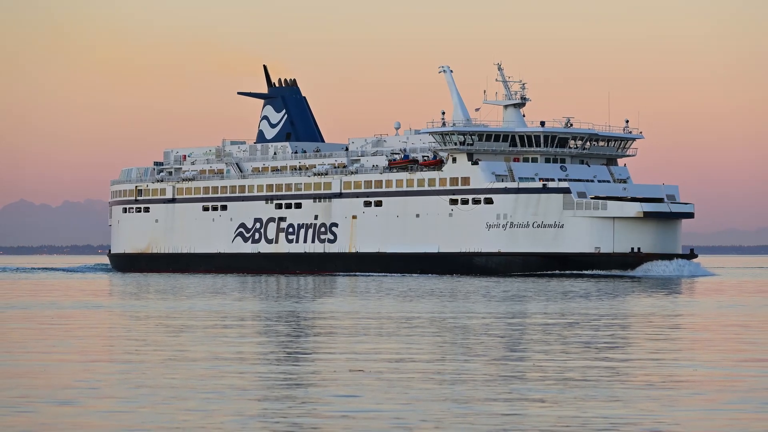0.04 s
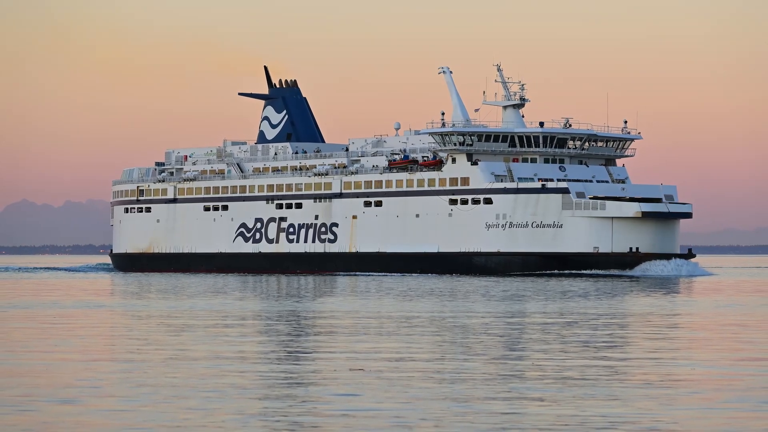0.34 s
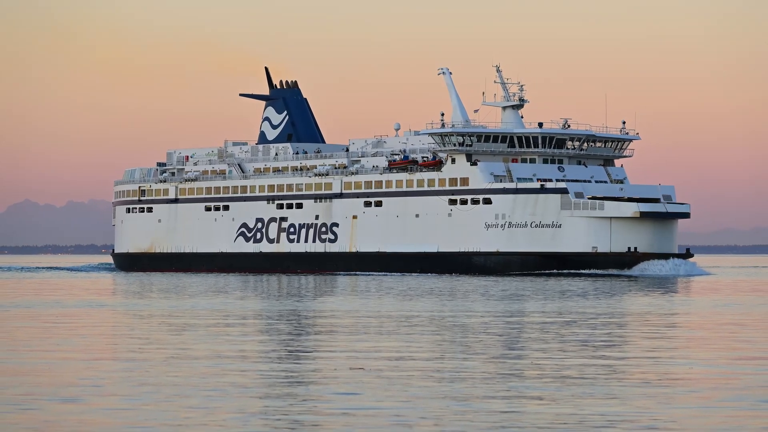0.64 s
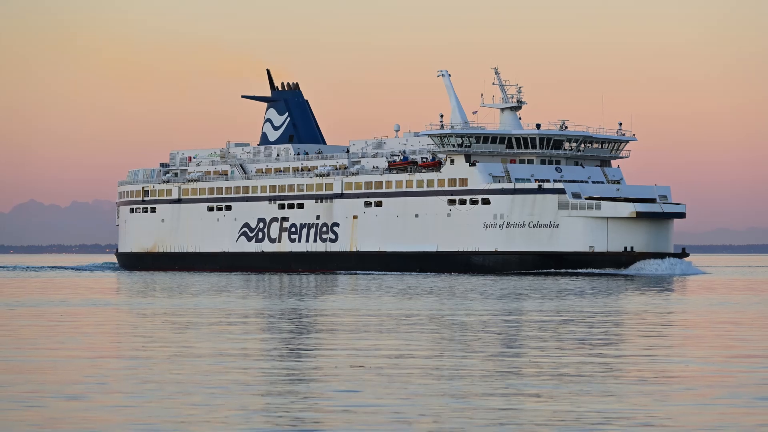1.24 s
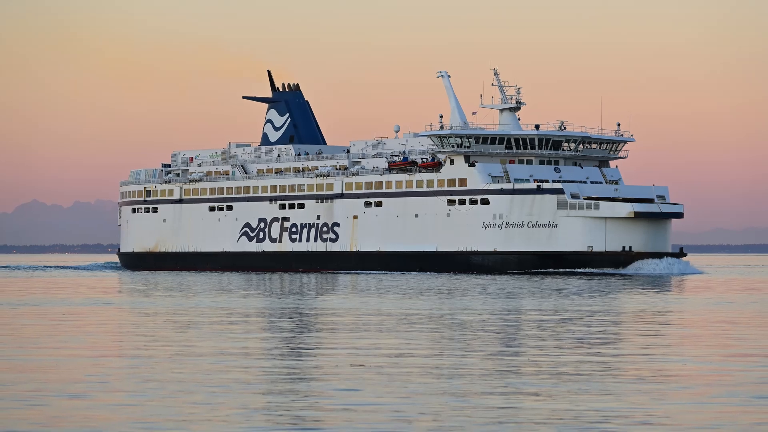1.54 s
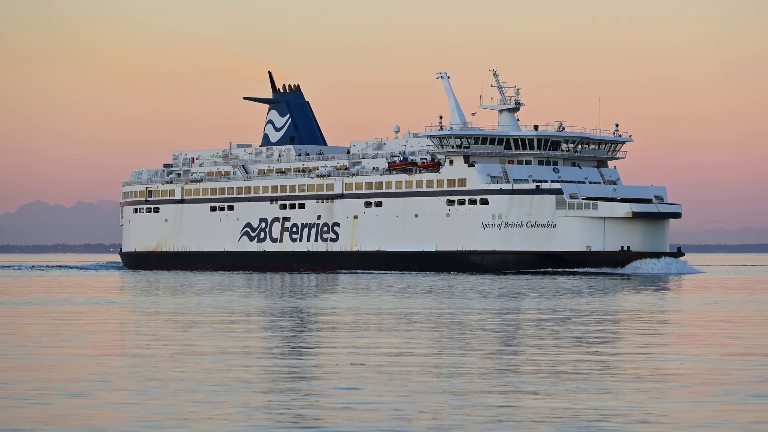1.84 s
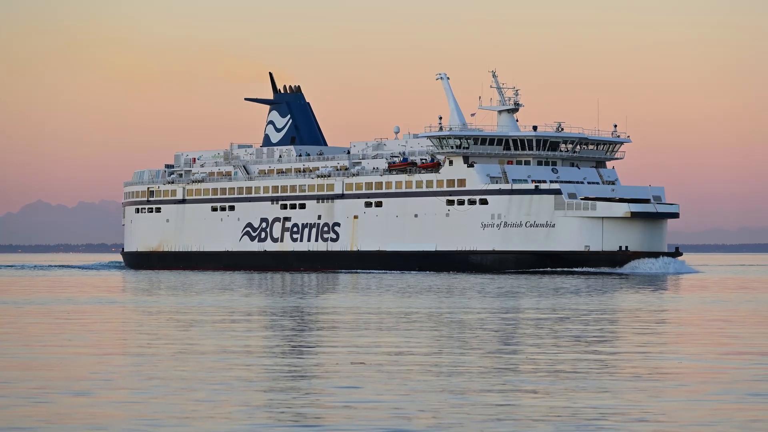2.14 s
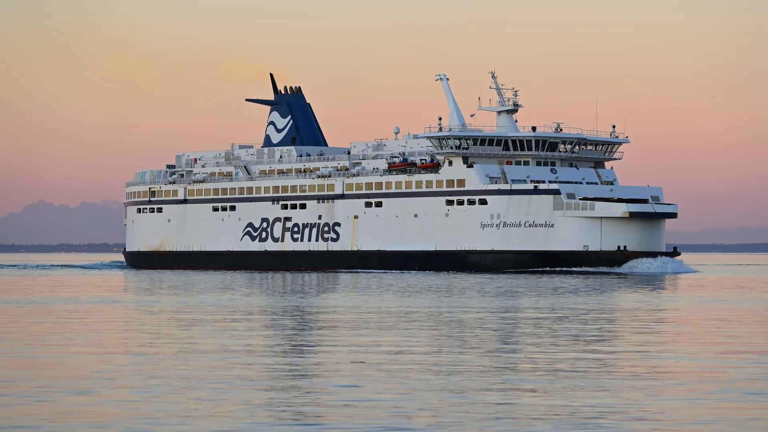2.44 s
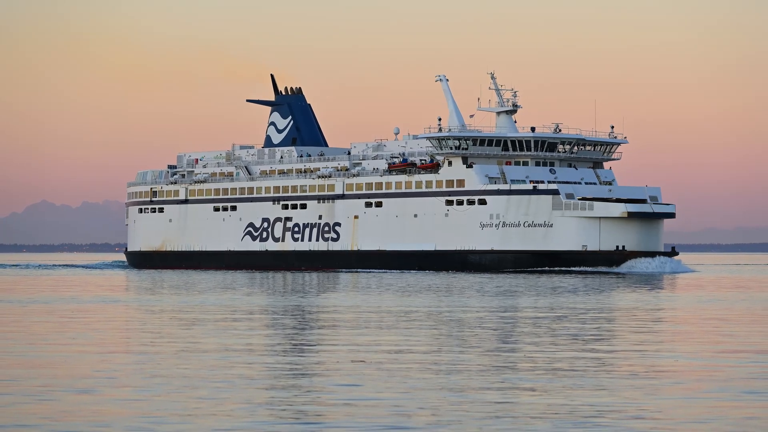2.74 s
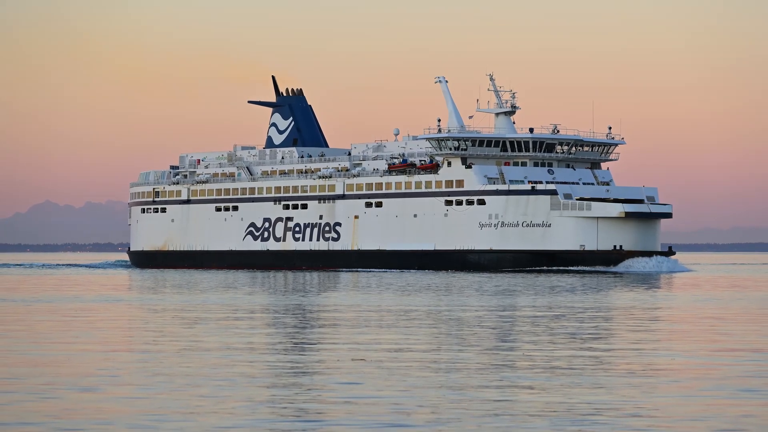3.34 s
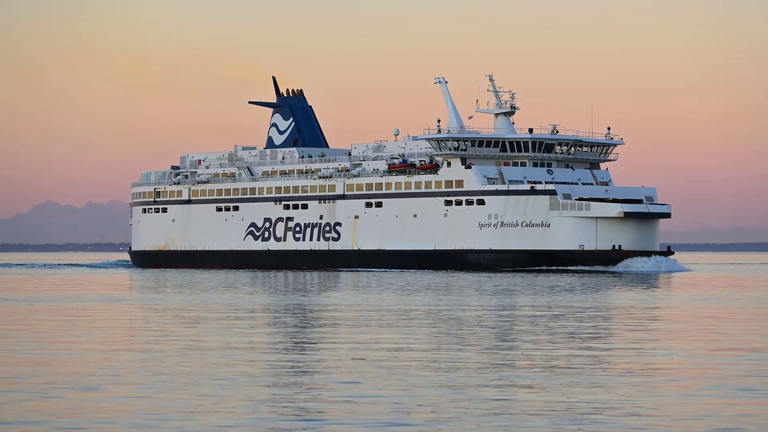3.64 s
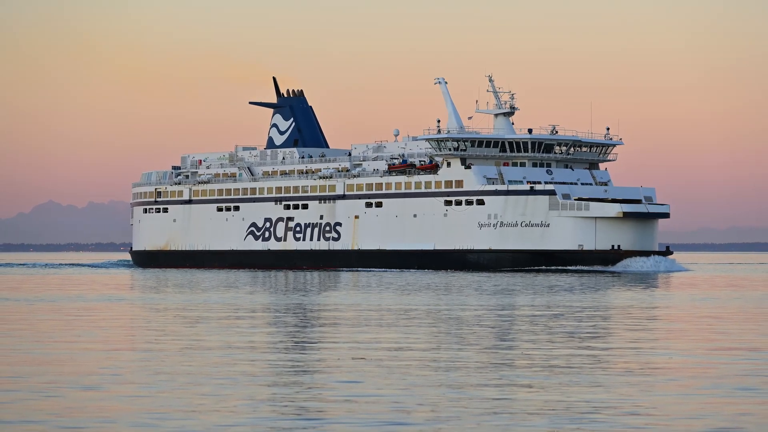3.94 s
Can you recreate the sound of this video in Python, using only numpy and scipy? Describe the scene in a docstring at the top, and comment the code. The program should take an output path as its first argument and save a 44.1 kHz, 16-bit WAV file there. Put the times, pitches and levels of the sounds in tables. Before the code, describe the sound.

A ferry horn holds one loud, low note throughout, slightly wavering with an uneven buzz, straight ahead of the microphone across calm water. Beneath it lie low engine rumble, a soft wash of water and very faint, distant chirping.

```python
"""A ship's horn holds one low note over calm water, straight ahead of a stereo microphone.
The note is mostly a fundamental and its octave, with crests taller than its troughs.
The recorder's fast limiter snaps down on every crest, which adds an uneven buzz.
Under it lie engine rumble, a soft wash, far chirping and two faint ticks, perhaps drips."""
import sys
import numpy as np
from scipy import signal
from scipy.fft import rfft, irfft
from scipy.io import wavfile
from scipy.ndimage import minimum_filter1d

SR = 44100
rng = np.random.default_rng(int(sys.argv[2]) if len(sys.argv) > 2 else 0)


def unload_wav(signal):
    """Save mono or channel-first audio to the path in sys.argv[1] as 16-bit WAV at rate SR, clipped to [-1, 1]."""
    wavfile.write(
        sys.argv[1],
        SR,
        np.round(np.clip(np.atleast_2d(signal).T, -1, 1) * 32767).astype(np.int16),
    )


N = 176400
T = np.arange(N) / SR
LIMIT = 0.46  # the limiter's ceiling, as an amplitude


def horn_note(waver_hz=0.23, shimmer_db=0.87, drift_hz=6.2):
    """Harmonics of one wavering pitch, each shimmering in level on its own."""
    # the note: time_s, pitch_hz
    pitch = [(0.0, 138.2), (0.44, 137.8), (0.68, 139), (0.8, 139.1), (1.12, 138.9), (1.24, 139.2),
             (1.36, 138.7), (1.52, 139.1), (1.84, 139.1), (3.0, 138.6), (3.12, 139.6), (3.24, 137.8),
             (3.76, 139.8), (4.0, 137.7)]
    # harmonics 1 to 5, ahead of their trims: time_s, level_db
    fundamental = [(0.0, -17.5), (0.2, -13.5), (0.32, -18.5), (0.44, -13.5), (0.56, -17.5), (0.68, -15),
                   (0.8, -17), (1.32, -16), (1.52, -15), (1.6, -13.5), (1.76, -16), (1.84, -14),
                   (2.16, -13.5), (3.0, -14), (3.08, -18.5), (3.24, -13.5), (3.52, -13.5), (4.0, -15)]
    octave = [(0.0, -13), (0.16, -13), (0.64, -13), (0.8, -12), (0.88, -14.5), (1.0, -12), (1.32, -13.5),
              (1.52, -13), (1.6, -15.5), (1.72, -12), (1.84, -15.5), (2.2, -13.5), (2.32, -16.2),
              (2.56, -13), (3.0, -15), (3.08, -11.5), (3.24, -15), (4.0, -13.5)]
    twelfth = [(0.0, -32), (0.56, -32), (1.08, -39), (1.24, -34.5), (1.4, -35), (2.36, -32.5), (2.76, -32),
               (3.04, -30), (3.16, -40.0), (3.28, -31), (3.84, -27.5), (4.0, -29)]
    fourth = [(0.03, -32), (0.08, -29.5), (0.55, -30), (1.51, -37), (1.53, -32.5), (3.96, -35.5)]
    fifth = [(0.03, -45.5), (0.55, -44.5), (0.58, -37), (1.62, -39.5), (2.42, -46.5), (3.78, -48.5),
             (3.83, -40.5), (3.96, -43)]
    # a faint overtone held throughout: harmonic_number, level_db
    overtones = [(7, -46)]
    trims_db = [(fundamental, 1), (octave, -0.82), (twelfth, 4), (fourth, -2), (fifth, -6.5)]
    levels_db = [curve(rows) + trim for rows, trim in trims_db]
    phase = 2 * np.pi * np.cumsum(curve(pitch) + waver_hz * drift(drift_hz)) / SR
    note = np.zeros(N)
    for k, db in list(enumerate(levels_db, 1)) + overtones:
        lag = (k > 2) * np.pi / 2  # upper harmonics run a quarter cycle late
        note += from_db(db + shimmer_db * drift(drift_hz)) * np.sin(k * phase - lag)
    return np.sqrt(2) * note


def horn(bulge_per_db=0.22, hoarse_until_s=0.63):
    """A square law makes the note lopsided, so its crests outgrow its troughs."""
    # the underlying lopsidedness: time_s, square_law_share
    base_bulge = [(0, 0.18), (.53, 0.33), (.6, 0.21), (1.4, 0.28), (2.0, 0.28), (2.2, 0.36), (2.35, .4),
                  (2.5, 0.28), (2.9, 0.18), (3.15, 0.39), (3.35, 0.18), (3.7, 0.34), (4, 0.31)]
    note = horn_note()
    low_band = signal.butter(2, [20, 370], "band", fs=SR, output="sos")
    squared = signal.sosfiltfilt(low_band, note ** 2, padtype="even", padlen=SR // 10)
    # cycle-to-cycle chance, stronger before the note clears
    sputter = (0.26 + 0.14 * (T < hoarse_until_s)) * drift(110)
    bulge = curve(base_bulge) + 0.18 * surges() + bulge_per_db * rasp_db() + sputter
    return from_db(0.13 * rasp_db()) * (note + bulge * squared)


def surges(first_s=0.56, every_s=0.242, count=6, rise_s=0.034, fall_s=0.13):
    """Evenly spaced swells in the horn's rasp that rise fast and sink slowly, 0 to 1."""
    starts = first_s + every_s * np.arange(count)
    return sum(np.interp(T - start, [0, rise_s, rise_s + fall_s], [0, 1, 0]) for start in starts)


def rasp_db():
    """The rasp about its mean; it drives the horn's level, its bulge and the rumble."""
    # strength of the rasp: time_s, relative_db
    rasp = [(0, -39.5), (0.19, -35.5), (0.25, -38.5), (0.33, -37), (0.4, -36), (0.52, -39.0), (0.59, -31),
            (0.74, -38), (0.83, -34), (1.3, -35.3), (1.45, -37.5), (1.56, -36), (2.22, -38.5), (2.36, -38),
            (2.95, -39), (3.1, -37.5), (3.35, -40), (4, -39.0)]
    db = curve(rasp)
    return db - db.mean()


def engine():
    """The ship's low rumble, swelling with the horn's rasp."""
    # rumble spectrum: frequency_hz, relative_db
    rumble = [(20, -28.5), (35, -20.5), (52, -3), (65, 2), (100, 2.5), (130, -17.5), (220, -14.5),
              (340, -11.5), (500, -18), (900, -32.5)]
    return from_db(-29.5 + 0.5 * rasp_db()) * noise(rumble)


def water(level_db=-41, width=0.2):
    """A soft even wash around the microphone, slightly different on each side."""
    # wash spectrum: frequency_hz, relative_db
    wash = [(300, -15), (700, 3), (1500, -7.5), (3300, -19.5), (4500, -18), (5400, -25), (6400, -22),
            (8000, -28), (15000, -35)]
    middle, side = noise(wash), noise(wash)
    return from_db(level_db) * (middle + width * side * np.array([[1], [-1]]))


def ticks(pitch_hz=6100, decay_s=0.0012):
    """Tiny high rings, perhaps drips, that die within a few milliseconds."""
    # the ticks: start_s, level_db
    drips = [(.465, -40), (1.055, -46.5)]
    out = np.zeros(N)
    for start, db in drips:
        age = np.maximum(T - start, 0)
        envelope = from_db(db) * np.exp(-np.minimum(age / decay_s, 20))
        out += envelope * np.sin(2 * np.pi * pitch_hz * age)
    return out


def chirping(chirp_s=0.023, fall=0.07, spread=0.041, pan_db=13, wave_db=3, wave_s=0.4, peak_s=0.41):
    """Far, short falling whistles at random moments, coming in waves, mostly from the left."""
    # two bands of chirps: pitch_hz, chirps_per_s, level_db
    bands = [(4497, 70, -58.5), (6310, 180, -65)]
    out = np.zeros((2, N))
    progress = np.linspace(0, 1, int(chirp_s * SR))
    envelope = np.sin(np.pi * progress) ** 2
    for hz, per_s, db in bands:
        flock = np.zeros((2, N + len(progress)))
        for start, pitch, size, pan in rng.random((int(per_s * N / SR), 4)):
            glide_hz = hz * (1 + spread * (2 * pitch - 1) - fall * (progress - 0.5))
            whistle = (1 + size) * envelope * np.sin(2 * np.pi * np.cumsum(glide_hz) / SR)
            sides = from_db(pan_db * (2 * pan - 0.5) * np.array([[1], [-1]]))
            i = int(start * N)
            flock[:, i:i + len(whistle)] += whistle * sides
        out += from_db(db) * unit_rms(flock[:, :N])
    return out * from_db(wave_db * np.cos(2 * np.pi * (T - peak_s) / wave_s))


def limiter(x, attack_db_per_s=16496, release_db_per_s=598.5):
    """The gain dives just in time to hold each crest at the limit and recovers in about a cycle."""
    size = np.abs(x.mean(axis=0))
    crest = size >= -minimum_filter1d(-size, size=9)
    over_db = crest * 20 * np.log10(np.maximum(size / LIMIT, 1))
    attack, release = attack_db_per_s * T, release_db_per_s * T
    held_db = np.maximum.accumulate(over_db + release) - release
    # run backwards, so each dive starts ahead of its crest
    cut_db = np.maximum.accumulate((held_db - attack)[::-1])[::-1] + attack
    return x * from_db(-cut_db)


def crackle(x, jitter_db=-40.5):
    """Crests that sit at the limit pick up a fine grit of gain jitter."""
    at_limit = np.abs(x.mean(axis=0)) > LIMIT
    return x * (1 + from_db(jitter_db) * at_limit * rng.standard_normal(N))


def from_db(db):
    """Decibels to gain."""
    return 10 ** (np.asarray(db) / 20)


def unit_rms(x):
    """Scale to an rms of 1."""
    return x / np.sqrt(np.mean(x ** 2) + 1e-20)


def curve(rows):
    """Join (time_s, value) points into a value at every sample."""
    return np.interp(T, *np.transpose(rows))


def drift(rate_hz):
    """Random wander, mostly slower than rate_hz; rms 1."""
    hz = np.arange(N // 2 + 1) * SR / N
    return unit_rms(irfft(rfft(rng.standard_normal(N)) / (1 + (hz / rate_hz) ** 2), N))


def noise(spectrum):
    """Noise of a given colour that falls away beyond its last point; rms 1."""
    points_hz, db = np.transpose(spectrum)
    hz = np.maximum(np.arange(N // 2 + 1) * SR / N, 1)
    gain = from_db(np.interp(np.log(hz), np.log(points_hz), db))
    gain /= np.maximum(hz / points_hz[-1], 1) ** 2
    return unit_rms(irfft(rfft(rng.standard_normal(N)) * gain, N))


def scene(fade_s=0.004):
    """At the microphone: the ship straight ahead, water around it, chirping far off."""
    fade = np.minimum(np.minimum(T, T[-1] - T) / fade_s, 1)
    return (horn() + engine() + water() + ticks() + chirping()) * fade


def record(dry, gain_db=0.46, lean_right_db=0.76, cutoff_hz=15900):
    """The recorder: a gritty limiter, a slight lean to the right and the top cut off."""
    sides = from_db(gain_db + lean_right_db * np.array([[-0.5], [0.5]]))
    low_pass = signal.ellip(12, 0.1, 80, cutoff_hz, fs=SR, output="sos")
    return signal.sosfilt(low_pass, crackle(limiter(dry)) * sides)


dry = scene()
out = record(dry)
unload_wav(out)
```